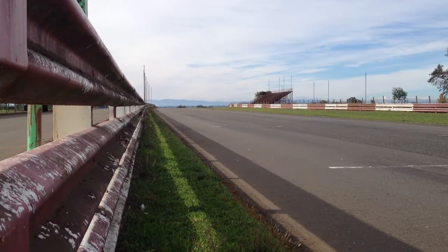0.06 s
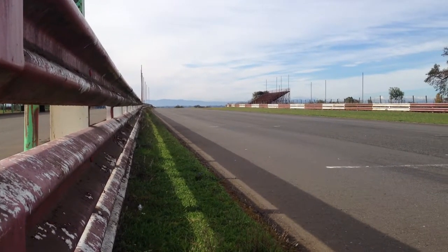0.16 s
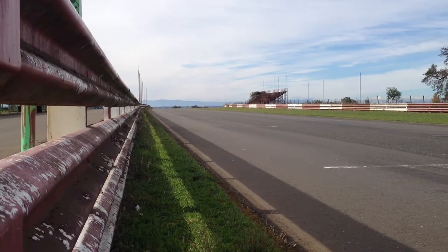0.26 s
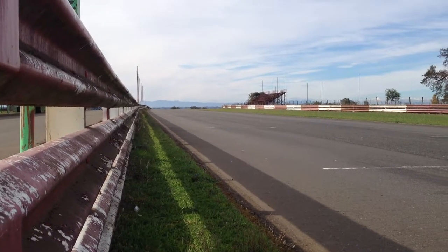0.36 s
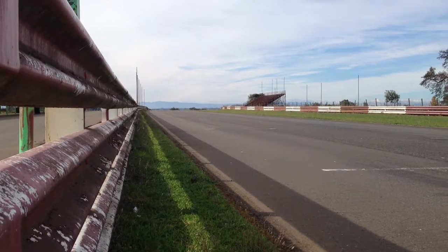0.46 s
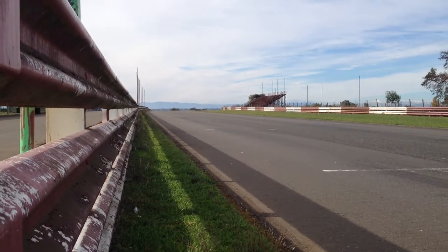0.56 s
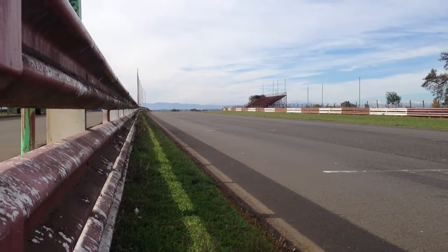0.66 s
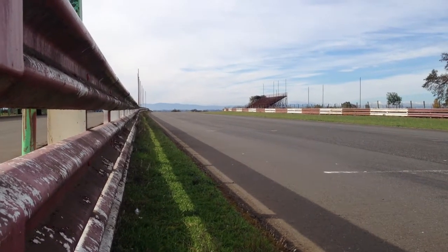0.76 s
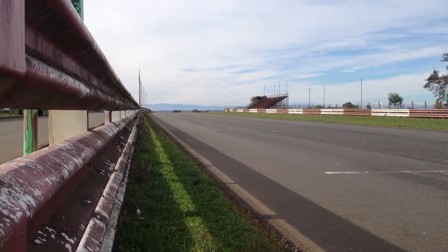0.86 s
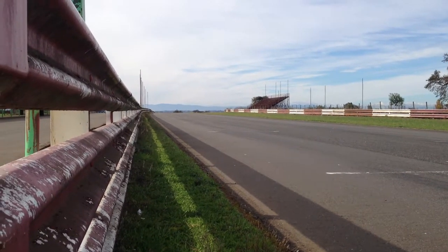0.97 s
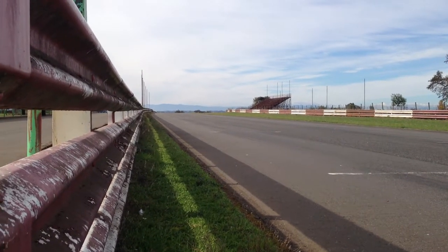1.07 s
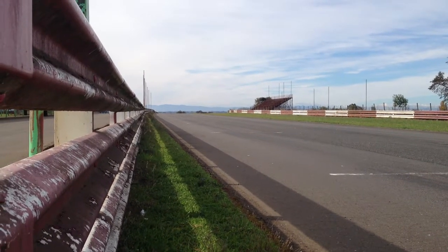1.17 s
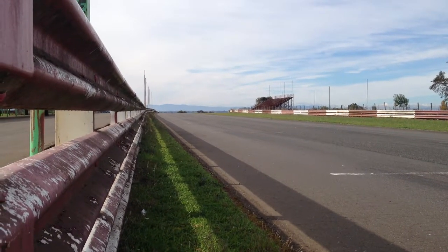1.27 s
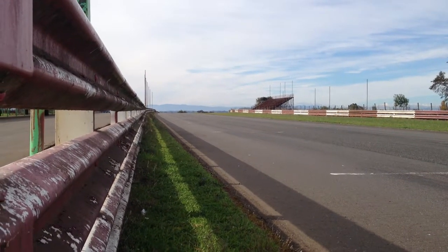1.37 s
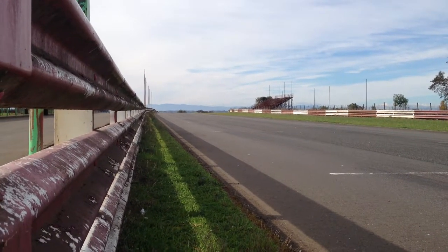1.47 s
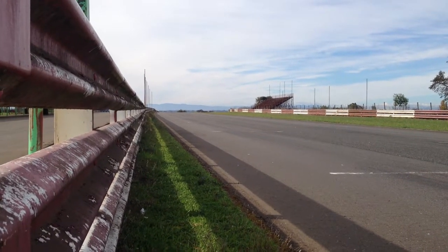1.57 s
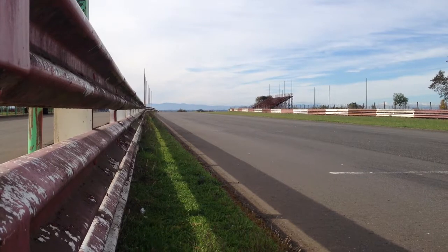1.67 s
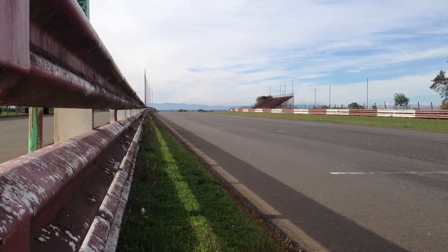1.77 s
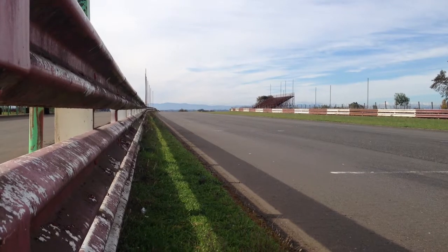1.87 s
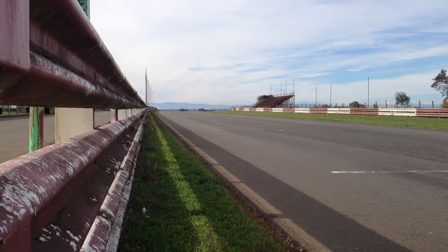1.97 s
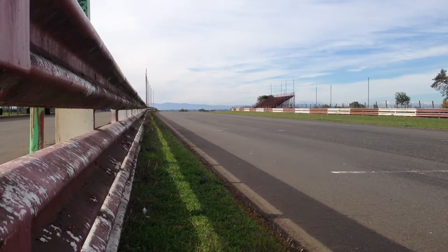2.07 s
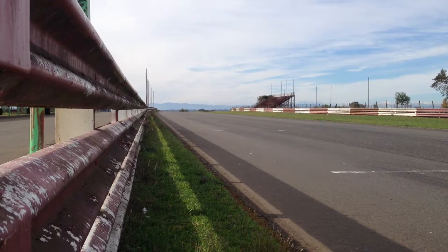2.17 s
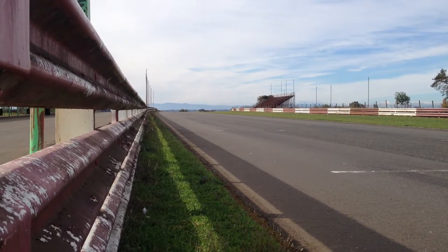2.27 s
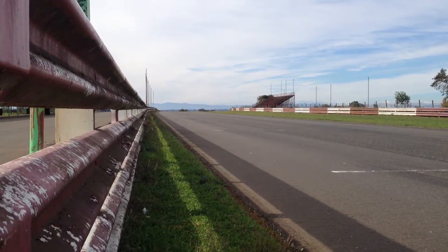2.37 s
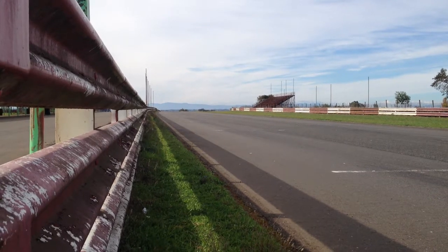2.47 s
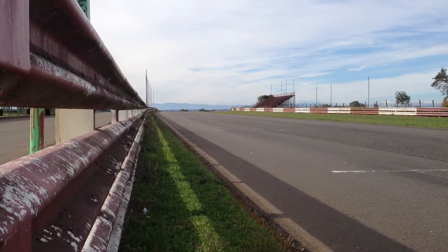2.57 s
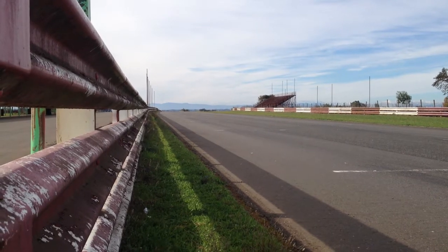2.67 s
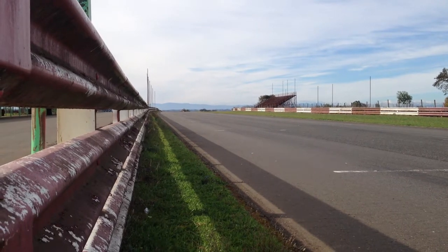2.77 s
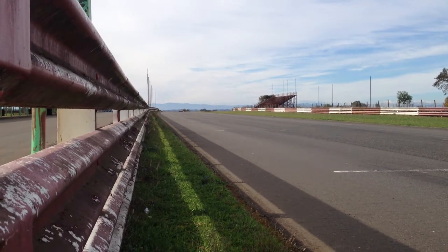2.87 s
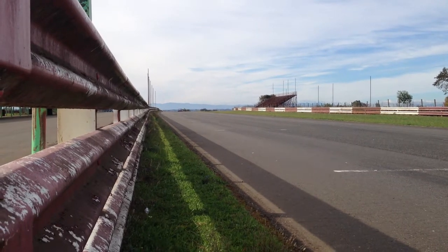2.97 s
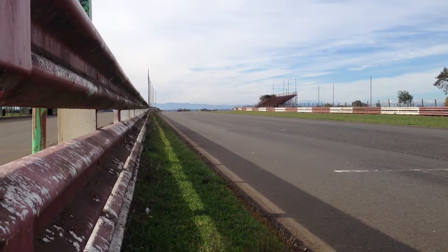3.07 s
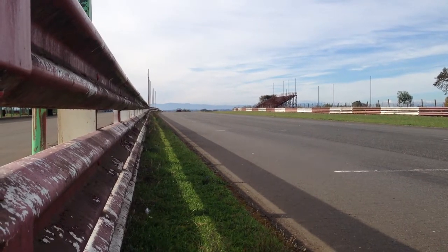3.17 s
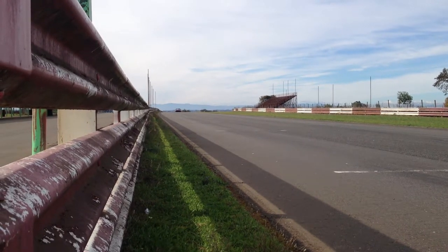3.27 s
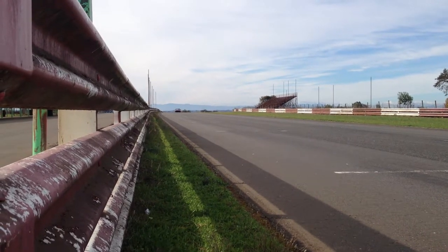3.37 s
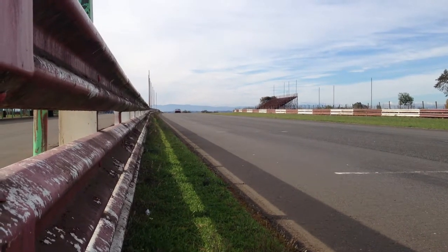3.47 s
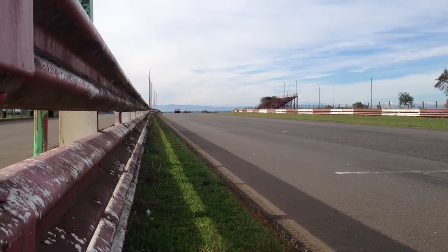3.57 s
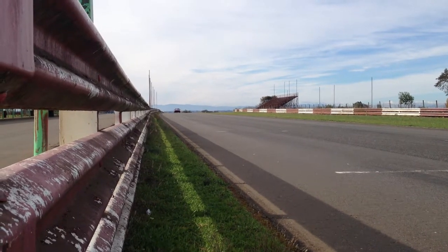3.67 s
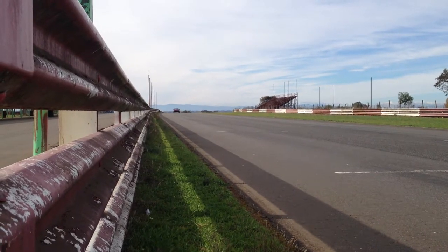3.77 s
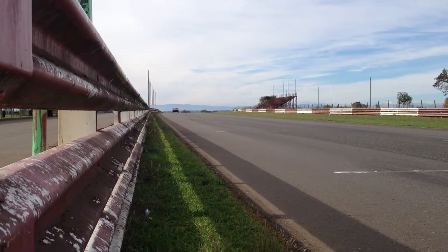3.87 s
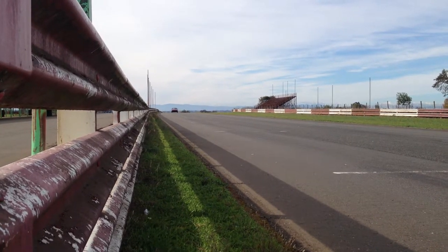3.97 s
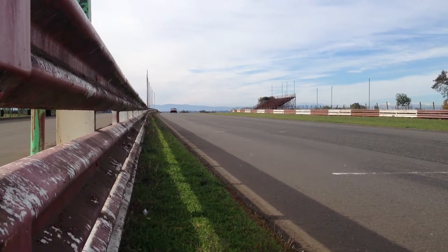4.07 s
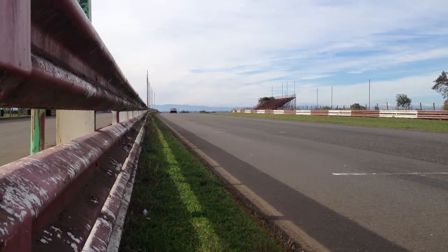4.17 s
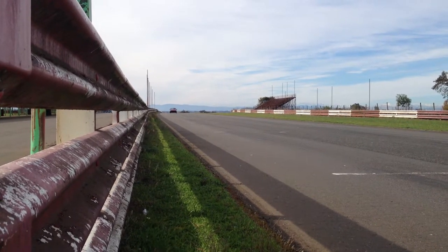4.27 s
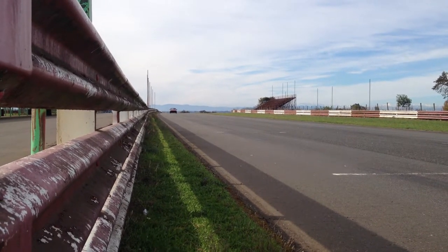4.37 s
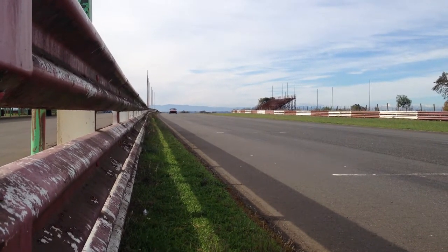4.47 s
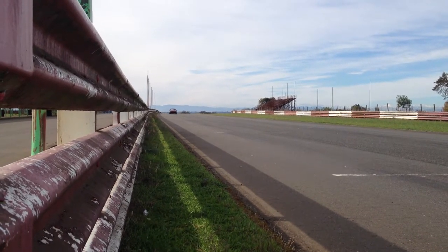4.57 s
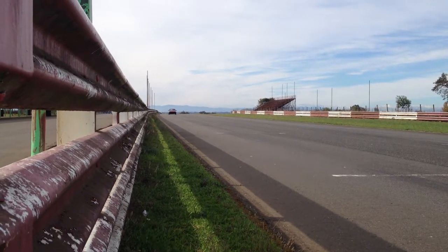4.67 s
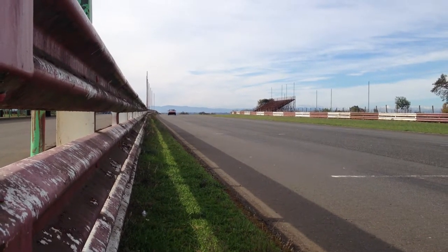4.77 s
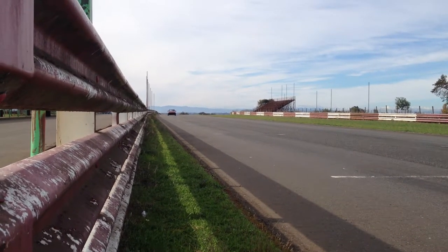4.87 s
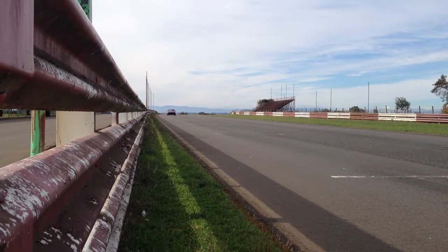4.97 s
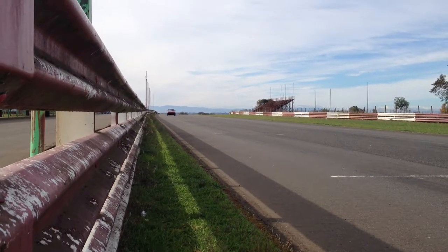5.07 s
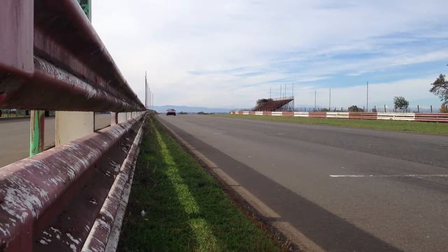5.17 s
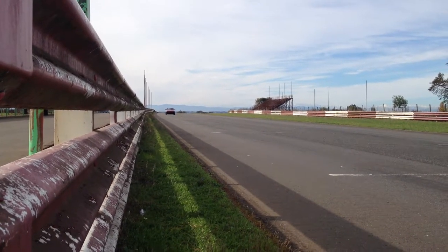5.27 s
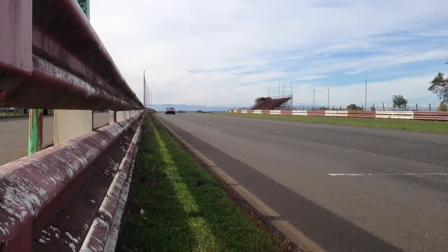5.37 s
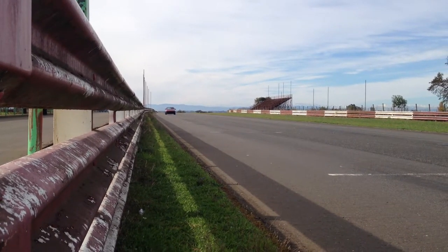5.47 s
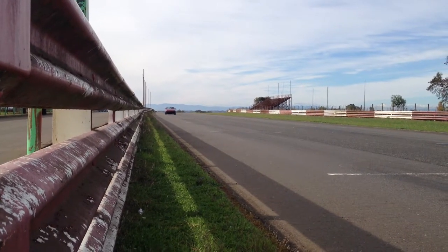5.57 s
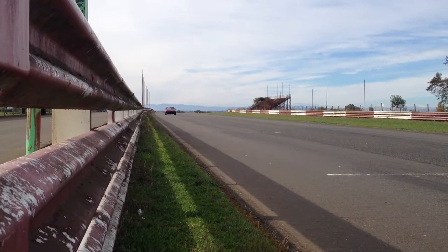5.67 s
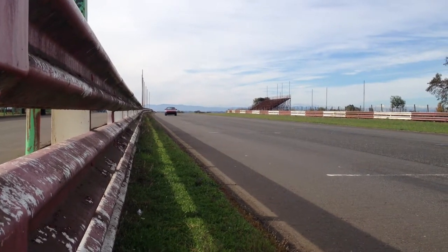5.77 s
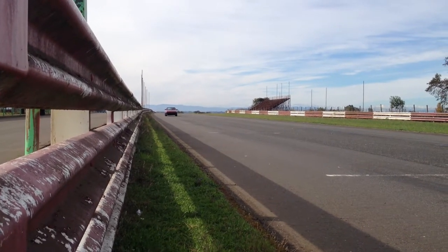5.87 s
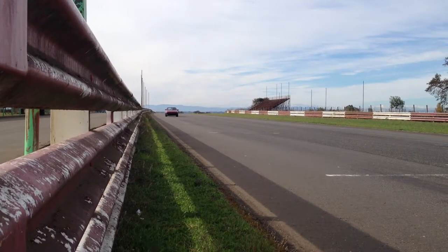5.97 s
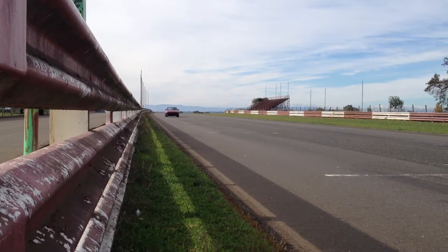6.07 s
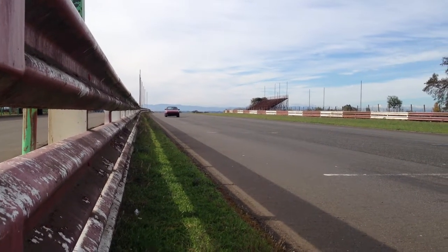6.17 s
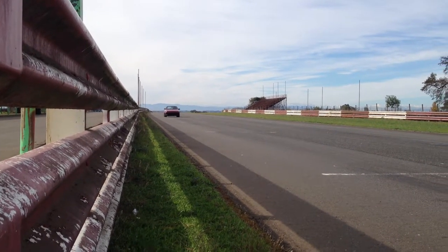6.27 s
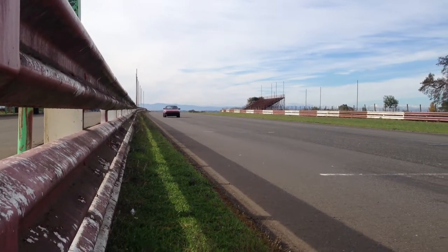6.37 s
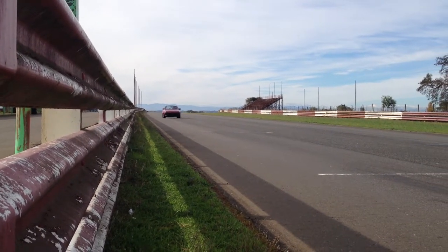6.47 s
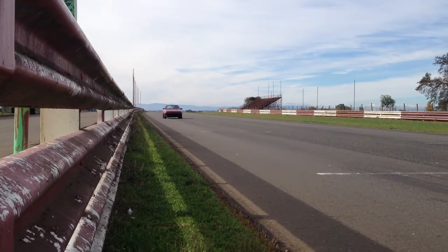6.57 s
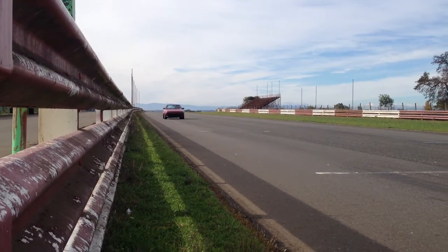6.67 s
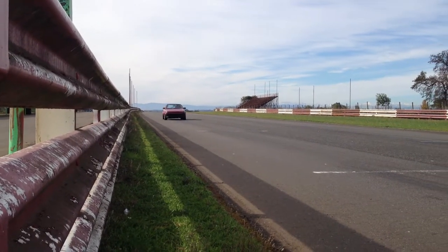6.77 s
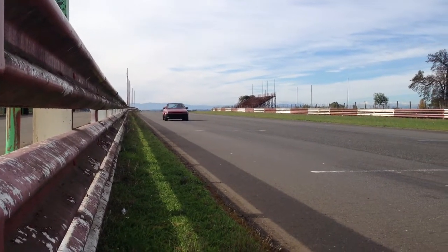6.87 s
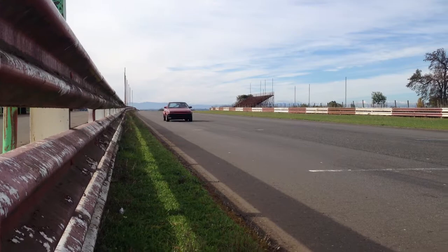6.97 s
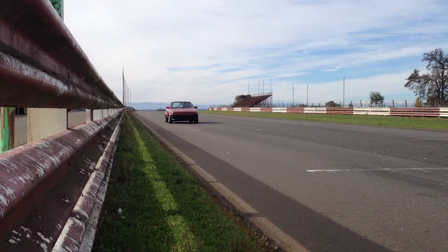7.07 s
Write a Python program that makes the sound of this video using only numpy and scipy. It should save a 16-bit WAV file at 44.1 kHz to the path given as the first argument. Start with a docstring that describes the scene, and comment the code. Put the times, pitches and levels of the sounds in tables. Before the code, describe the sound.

Far-off engine whine rises, dips sharply with a gear change around two seconds, then climbs steadily to a loud, harsh approach that never passes.

```python
"""A straight road with a steel guard rail, the microphone beside it: a small four-cylinder car nears, accelerating.
It pulls to the top of one gear, lifts for the change and climbs again, louder and brighter as it nears.
Clean tones at multiples of the firing rate make the note; filtered firing pulses and gas noise make the rasp.
An echo off the far barrier beats with the low orders; the upper orders swell and fade on their own.
Tyre rumble, hiss, exhaust pops and low thumps join in over quiet air and recorder noise."""
import sys
import numpy as np
from scipy import signal
from scipy.fft import rfft, irfft, next_fast_len
from scipy.io import wavfile
from scipy.ndimage import uniform_filter1d, map_coordinates

SR = 44100
rng = np.random.default_rng(int(sys.argv[2]) if len(sys.argv) > 2 else 0)


def store_pcm(level_fs):
    """Save levels as 16-bit WAV."""
    pcm = np.round(np.clip(level_fs, -1, 1) * 32767).astype(np.int16)
    wavfile.write(sys.argv[1], SR, np.atleast_2d(pcm).T)


N = 314433

# the car's approach, before trims and fades: (time [s], firing rate [Hz], firing note [dB],
# other orders over the note [dB], roar [dB], treble over the roar [dB])
CAR = [(0, 251, -40, -1.5, -65.5, -7), (.3, 259.9, -39.5, -2, -63.5, -3.5), (.9, 268.3, -39, 1, -61.5, -4),
       (1.3, 275, -39, 3.5, -61, -6.5), (1.83, 284, -38.5, 4, -57, -2.5), (1.92, 268, -40.5, 3, -60, -6.5),
       (2.12, 249, -42, -1.5, -58.5, -6), (2.28, 234.3, -38, 0.5, -54, -9.5),
       (2.35, 215.4, -38, -3.5, -52.5, -11), (2.45, 194.5, -35, -4.5, -51, -11.5),
       (2.67, 197.9, -35, -3.5, -53, -1), (3.1, 203, -32, -3.5, -49.5, -1),
       (3.55, 207.5, -31, -1, -46.5, -2.5), (4.1, 215.5, -27, -1.5, -43.5, -5),
       (4.55, 221.6, -24.5, -2.5, -43, -3), (4.95, 227.3, -26, 1, -40.5, -6.5),
       (5.4, 233.9, -23.5, 3.5, -37.5, -9), (5.8, 239.4, -20, 2, -35.5, -5.5),
       (6.2, 244.8, -17.5, -1, -30.5, -6.5), (6.6, 250.4, -14, -4, -27, -6),
       (7.0, 254.5, -12.5, -5.5, -22, -7), (7.13, 257.9, -12, -4, -23, -9)]
# clean tones beside the note, by multiple of the firing rate: (level over the note and other-orders curves [dB],
# added in the first gear heard [dB], added with the foot off [dB])
ORDERS = {".75": (-15, 1, -9), "1.25": (-11, -12, -23), "1.75": (-22.5, -4, -6), "2": (-13.5, -7, -9.5),
          "2.25": (-38, -4, -8), "3": (-27.5, -7.5, -5.5), "3.5": (-32.5, -11, -8), "4": (-28.5, -6, -1.9),
          "4.25": (-33, -9, 0), "5": (-33.5, -7, -8), "6": (-36, -2, -3), "7": (-35.5, -3, -2),
          "8": (-38.5, -3, 1), "9": (-40.5, 1.3, 2), "10": (-43.5, -1.5, -4), "2.75": (-32.5, -9, -9),
          "3.25": (-36.5, -9, -3), "3.75": (-35, -7, 0), "4.5": (-41, 0, -4), "4.75": (-41.5, 0, -4),
          "13": (-49.5, 0, -4), "11": (-40, -7, -4), "12": (-43.5, -5, -4)}
LIFT_S, BITE_S, LOCK_S = 1.87, 2.285, 2.48  # foot off, clutch bites, clutch locked
ARRIVE_S = 8.1  # the car would draw level then, after the end


def revs():
    """Firing rate [Hz]: the driveline winds and unwinds, so the revs rock around their climb."""
    # (middle [s], half length [s], period [s], depth [Hz], time of a crest [s])
    rocking = [(.7, .52, .26, 6.3, .615), (2.3, .17, .085, 3, 2.255), (5.8, .45, .2, 2.2, 5.7)]
    t = np.arange(N) / SR
    rate_hz = curves(CAR)[0]
    for middle, half, period, depth_hz, crest in rocking:
        rate_hz = rate_hz + bumps([(middle, half, depth_hz)]) * np.cos(2 * np.pi * (t - crest) / period)
    return rate_hz


def unsteady():
    """Unevenness of firing: more ragged through the gear change."""
    return 1.35 + 2.55 * during(LIFT_S, LOCK_S)


def note(fired):
    """The strong orders are clean tones that drift in level and phase; some beat with an echo."""
    # the firing note dips or surges briefly: (time [s], half length [s], level [dB])
    flutter = [(.6, 0.036, -2), (.89, 0.024, -4.5), (.98, .07, 2), (1.15, 0.029, -3.5), (1.87, 0.034, -8),
               (2.02, 0.018, -8), (2.07, 0.021, -7), (2.19, 0.012, -12), (2.25, .02, -3),
               (2.49, 0.0067, -8), (3.6, 0.019, -3), (4.23, 0.098, -1.5), (5.95, 0.013, -6),
               (6.06, 0.022, -2.5), (6.16, .04, 2.5), (6.26, 0.027, -1), (6.39, 0.032, -1.5),
               (6.735, 0.026, 4.5), (6.85, 0.066, -1.5), (6.945, 0.029, 2.5), (6.49, 0.039, 2),
               (6.32, 0.021, 3), (6.58, 0.015, -4), (7.03, 0.016, -7.5), (7.075, 0.025, 1),
               (4.92, 0.031, -2.5), (2.43, 0.018, -3.5)]
    # an order swells or sinks for a while, by order: (time [s], half length [s], level [dB])
    swells = {".75": [(1.78, 0.054, 1), (4.45, 0.28, 3.5)], "1.25": [(.3, 0.93, 0.5), (2.32, 0.05, 7.5),
              (4.3, 0.73, 3.5), (6.25, 0.14, 3.5)], "1.75": [(.15, .06, 9), (.4, 0.39, -8), (4.2, 1, -2.5),
              (4.9, 0.33, 7.5), (6.5, 0.61, 7)], "2": [(0.9, 0.28, 6.5), (2.34, 0.063, -10),
              (3.19, 0.11, -15), (5.3, 0.59, -3.5), (2.06, .05, 6), (2.23, .03, 6), (2.385, .02, 8),
              (6.9, .2, 5), (4.54, 0.17, -13), (1.92, .12, -7.5)], "2.25": [(5.1, .3, 8.5),
              (6.8, 0.82, 19.5)], "3": [(1.54, 0.15, 9), (2.5, .04, 14), (2.36, .035, 9), (2.48, .04, 8),
              (3.29, .3, 7.5), (4.2, .05, -6), (5.06, .02, -15), (6.95, .3, 3.5), (5.45, 1.53, 10.5),
              (4.97, 0.038, 8), (0.14, .12, 8), (.6, .04, 9), (4.32, .3, 4)], "3.5": [(3.4, 1, 7)],
              "4": [(3.22, 0.76, 12.5), (4.2, 0.4, 5), (5.4, 0.44, 5), (6.9, 0.19, 6), (1.65, .08, 2)],
              "4.25": [(6.86, 0.41, 14), (3.4, 0.41, -6.5)], "5": [(0.25, .07, 13), (0.91, 0.13, 13.5),
              (1.22, .08, 14), (2.33, .05, 10), (5.2, .1, 5), (2.983, 0.23, 15), (4.425, 0.6, 13),
              (7, 0.2, 18), (2.65, .1, 9), (3.5, 0.077, 7)], "6": [(1.217, 0.054, 12), (3.92, 0.083, 9.5),
              (1.72, 0.13, 7), (4.927, 0.52, 11.5), (6.93, 0.72, 20), (.5, .15, 4), (3.1, 0.09, 8),
              (3.45, .15, 8), (9.3, .15, 4.5)], "7": [(3.08, 0.42, 22.5), (3.87, 0.43, 13),
              (6.15, 0.31, 13), (6.58, 0.21, 18), (7, .2, 17.5), (2.6, 0.12, 10.5)],
              "8": [(3.06, 0.55, 22.5), (1.83, 0.081, 13), (4.8, .25, 6)], "9": [(.3, 0.25, 7),
              (.95, 0.12, 11), (1.45, .15, 4), (6.85, 0.18, -1), (3.05, 0.43, 21), (3.9, 0.21, 13.5),
              (6.1, .3, 0)], "10": [(3.05, 0.32, 11), (3.7, .3, 16.5), (6.05, 0.087, 8), (7, .15, 6)],
              "2.75": [(5.95, 0.82, 8.5)], "3.25": [(4.1, 0.91, 17)], "3.75": [(3.4, 1.5, 9.5)],
              "4.5": [(6.3, 0.67, 17)], "4.75": [(5.25, 0.62, 15.5), (6, .3, 5), (7, .15, 12)],
              "13": [(3.4, 0.29, 20)], "11": [(3.4, .15, 14), (2.63, 0.15, 17), (2.86, 0.2, 17),
              (3.3, .15, 9)], "12": [(2, .06, 14), (2.9, .3, 16), (2.9, .15, 16.5)]}
    # echo off the far barrier, by order; a negative share is inverted: (lag part growing as the car nears,
    # at one second away [ms], constant lag part [ms], share far away, share at one second away)
    echoes = {".75": (33.5, -16.5, -0.3, 1.27), "1": (28.5, -1.5, 0.13, 0.13),
              "1.25": (37, -13.5, -0.25, 1.38), "1.75": (22, 40.3, 0.36, 0.8), "2": (31.5, -7.5, 0.5, 1.3),
              "3": (37, -17.5, 0.3, 0.7)}
    # how far the note's neighbours turn from bending its pitch to pulsing its level: (time [s], turn [radians])
    throb = [(0, 1.8), (1.8, 1.8), (2.5, .3), (3.4, .7), (4.1, 1.3), (4.6, .5), (7.13, .7)]
    barrier_s = 2.9  # the car comes alongside the barrier
    blur_db = -6  # orders above the third sink this far while the foot is off
    roughness = .1  # the upper orders grow rougher as the car nears [radians per order, at one second away]

    rate_hz, note_db, other_db = curves(CAR)[:3]
    lifted, first, ragged = during(LIFT_S, BITE_S), during(-1, LIFT_S), unsteady()
    changing = during(LIFT_S, LOCK_S)
    levels = {}
    for name, (db, first_db, lift_db) in ORDERS.items():
        gear_db = first_db * first + lift_db * lifted
        blurred_db = blur_db * (float(name) > 3) * lifted
        levels[name] = note_db + other_db + db + gear_db + bumps(swells[name]) + blurred_db
    levels[".5"] = levels[".75"] - 21 + 20 * np.log2(rate_hz / 240)  # crank-rate order fades fast as revs fall
    levels["1"] = note_db + bumps(flutter)

    # the neighbours .75 and 1.25 keep a phase relation to the note
    shake, beside = wobble(12), rng.uniform(0, 2 * np.pi) + wobble(1.214)
    opposite = np.pi + curves(throb)[0] - beside + 0.33 * wobble(3.3)
    locked = {.75: beside, 1: 0, 1.25: opposite, 2: 0}
    tones = np.zeros(N)
    for name, db in levels.items():
        k = float(name)
        wander = locked.get(k, rng.uniform(0, 2 * np.pi) + 1.67 * wobble(1.195))
        raggedness = 0.1 * k * ragged * (shake if k < 1.5 else wobble(9))
        turn = 2 * np.pi * k * fired + raggedness + wander
        turn += roughness * k * (k > 2) / away() * wobble(45)

        near_ms, constant_ms, far, near = echoes.get(name, (0, 0, 0, 0))
        share = far + (near - far) / away()
        echo = share * during(barrier_s, ARRIVE_S) * amp(3 * wobble(6))
        lag_s = (constant_ms + near_ms / away()) / 1000
        scatter = .2 * k * wobble(7)  # gaps and posts make the echo path uneven
        echoed = echo * np.cos(turn - 2 * np.pi * k * rate_hz * lag_s + scatter)
        tone = (np.cos(turn) + echoed) / np.sqrt(1 + echo ** 2)

        fade_db = (.7 + 2.5 * (k > 1.5) * changing) * min(k - .4, 1.6) * wobble(14)
        # orders without an echo fade further on their own
        fade_db = fade_db + (2.2 + 1.5 * first * (k > 2)) * (name not in echoes) * wobble(8)
        tones += np.sqrt(2) * amp(db + fade_db) * tone
    return tones


def weak_orders(fired, fade_db, fade_rate):
    """Unequal cylinders sound every quarter of the firing rate; echoes fade each such line on its own."""
    # (frequency [Hz], level relative to the other weak lines [dB])
    between = [(290, -16.5), (400, -7), (750, 2), (900, -9.5), (1100, -4), (1260, -7.5), (1450, -3),
               (1700, -3.5), (1950, -11.5), (2250, -6), (2600, -7.5), (3000, -16)]
    rate_hz, roar_db = curves(CAR)[0], curves(CAR)[3]
    f, db = np.transpose(between)
    strong = [float(name) for name in ORDERS]
    lines = np.zeros(N)
    for k in np.arange(6, 52) / 4:
        if k not in strong:
            level_db = np.interp(np.log(k * rate_hz), np.log(f), db) + fade_db * wobble(fade_rate)
            turn = 2 * np.pi * k * fired + 0.18 * k * wobble(8) + rng.uniform(0, 2 * np.pi)
            lines += amp(level_db) * np.sin(turn)
    blur_db = 2.2 * during(LIFT_S, LOCK_S)  # uneven firing blurs them in the gear change
    return amp(roar_db - 12.5 - blur_db) * lines


def blows(fired, jitter, scatter_db):
    """One pulse a firing; the cylinders differ in strength and timing, and chance [firing gaps, dB] adds to it."""
    # (relative blow strength, lateness [firing gaps])
    cylinders = [(0.5, 0), (0.78, 0.017), (0.88, 0.012), (0.68, -0.007)]
    count = np.arange(1, int(fired[-1]))
    strength, late = np.transpose(cylinders)[:, count % 4]
    chance = rng.standard_normal((len(count), 2))
    at = np.interp(count + late + jitter * chance[:, 0], fired, np.arange(N - 0.))
    size = strength * amp(scatter_db * chance[:, 1])
    # each pulse is shared between the two samples around its moment
    whole = at.astype(int)
    early = np.bincount(whole, size * (1 - at + whole), N + 1)
    later = np.bincount(whole + 1, size * (at - whole), N + 1)
    return unit(early + later)[:N]


def rasp(fired):
    """Pulses and gas noise, puffed once a firing, ring in pipe and bodywork."""
    # colours of the four bands: (frequency [Hz], relative density [dB per Hz])
    roar_colour = [(200, -44), (340, 1.5), (700, -1.5), (1080, -4), (1250, -11), (1430, -3), (1750, -1),
                   (1950, -10), (2400, -26)]
    ring_colour = [(1700, -38), (2050, -5), (2200, 4), (2320, 2), (2450, 5), (2600, 1.5), (2730, -6.5),
                   (3100, -53.5)]
    rattle_colour = [(2500, -27), (2850, -11), (3250, -9), (3600, -12.5), (3900, -27)]
    clatter_colour = [(3400, -11.5), (3750, -2.5), (4050, -6), (4350, -10.5), (4650, -1.5), (4950, -16.5),
                      (5600, -39.5)]
    # the pipe and panels ring up or sink for a while:
    # (time [s], half length [s], ring [dB], rattle [dB], clatter [dB])
    buzzes = [(0.216, 0.15, 2, -2, -6), (.6, 0.065, -5, -3, -3), (.94, 0.15, 7.5, 0, -1),
              (1.435, 0.16, 3.5, 5, -1), (1.815, 0.056, -2, -1, -1), (2.05, 0.12, 5, 3.5, -0.5),
              (2.403, 0.16, 7.5, 12, 5), (2.702, 0.12, 0.5, -3, -4), (3.205, 0.44, 8.5, 3.5, -1.5),
              (6.052, 0.036, 2.5, 2, -0.5), (6.4, 0.45, -3, -2.5, 1), (5.298, 0.18, -4.5, -0.5, 0),
              (3.44, 0.07, 0.5, 3, 4.5), (3.65, 0.1, 4, -1, -4), (3.966, 0.082, 0.5, 0, -1),
              (4.21, 0.13, 0.5, 5.5, 2), (4.496, 0.14, -0.5, -2, -2), (5.736, 0.14, -3, 5, 0.5),
              (6.898, 0.24, 3, 2.5, 2)]
    own_waver_db = 1  # ring, rattle and clatter each waver in level on their own

    roar_db, treble_db = curves(CAR)[3:]
    s, half, *lifts = np.transpose(buzzes)
    ring_db, rattle_db, clatter_db = (roar_db + treble_db + bumps(zip(s, half, db)) for db in lifts)
    pulses = patchy(blows(fired, jitter=.007, scatter_db=1.2), depth_db=3.5, bins=1, frames=36)
    puff = 1 + .5 * np.cos(2 * np.pi * fired) + 0.043 * np.cos(np.pi / 2 * fired)
    noise = patchy(unit(puff * rng.standard_normal(N)), depth_db=2.8, bins=3, frames=14)

    def gas(share):
        """Pulses with this share of their power given to noise."""
        return np.sqrt(1 - share) * unit(pulses) + np.sqrt(share) * noise

    roar = amp(roar_db - 5.5) * coloured(gas(.9), roar_colour)
    ring = amp(ring_db - 2) * coloured(gas(.3), ring_colour)
    rattle = amp(rattle_db - 5.5) * coloured(gas(.4), rattle_colour)
    clatter = amp(clatter_db - 3.5) * coloured(gas(.7), clatter_colour)
    return roar + sum(amp(own_waver_db * wobble(13)) * band for band in (ring, rattle, clatter))


def flares(fired):
    """Narrow resonances flare up: each is a fuzzy tone around a fixed pitch, puffed once a firing."""
    # (time [s], half length [s], pitch [Hz], level before puff and fuzz [dB])
    resonances = [(.08, 0.11, 2420, -66), (.24, .08, 2440, -71.5), (0.452, .06, 2470, -64),
                  (.47, .05, 4550, -74), (.68, .07, 4700, -78), (.93, 0.14, 2380, -67),
                  (1.028, .05, 2350, -61), (.94, .05, 4560, -72), (1.218, .05, 4540, -66),
                  (1.23, .06, 2160, -67), (1.39, 0.09, 2440, -58), (1.522, 0.098, 4470, -70),
                  (1.59, 0.041, 2460, -57), (1.809, 0.081, 3340, -62), (1.81, 0.054, 2180, -59),
                  (1.8, .05, 2450, -61), (1.8, .06, 4570, -72)]
    t = np.arange(N) / SR
    puff = 1 + 0.47 * np.cos(2 * np.pi * fired) + 0.35 * np.cos(np.pi / 2 * fired)
    fuzz, drift = wobble(44.64), wobble(30)
    tones = np.zeros(N)
    for s, half, hz, db in resonances:
        tones += amp(db) * bumps([(s, half, 1)]) * np.cos(2 * np.pi * hz * t + 1.3 * drift)
    return puff * amp(2.4 * fuzz) * tones


def pops():
    """Unburnt fuel goes off in the pipe during the gear change: short dull puffs of noise."""
    # (time [s], level at the peak [dB])
    puffs = [(1.87, -47), (2.205, -44), (2.25, -52)]
    shape = bumps([(s, 0.015, amp(db)) for s, db in puffs])
    return shape * coloured(rng.standard_normal(N), [(75, -30), (140, 7), (240, 6), (400, -10), (900, -30)])


def thumps():
    """Soft one-sided pushes on the loudest surges, heard below the engine note."""
    # (time [s], half length [s], peak level [dB])
    pushes = [(6.737, .007, -44), (6.925, 0.0062, -49), (6.955, .006, -46), (7.078, .008, -38)]
    return bumps([(s, half, amp(db)) for s, half, db in pushes])


def road(fired):
    """Tyre rumble and the hiss of gas and air; the air swallows the top until the car is near."""
    # colours of the three noises: (frequency [Hz], relative density [dB per Hz])
    rumble_colour = [(25, -27.5), (70, -18), (120, -5), (200, 16), (280, 7), (380, -11.5), (600, -24)]
    hiss_colour = [(4200, -17), (5200, 0), (6300, 0), (8500, -8), (10000, -20), (12000, -29.5)]
    top_colour = [(7500, -18.5), (9000, 3), (10500, 1), (12500, -2.5), (15300, -9)]
    # the hiss swells for a while: (time [s], half length [s], level [dB])
    surges = [(3.7, 0.71, 1.5), (5.9, .3, 2), (6.15, 0.1, 2), (7.03, 0.052, 1.5)]
    rumble_near_db, rumble_fall_db = -26.5, 37  # at one second away; fall for ten times the distance
    top_near_db, air_db_per_s = -47.5, 19.5  # at one second away, before surges; loss for each further second

    roar_db, treble_db = curves(CAR)[3:]
    puff = 1 + 0.17 * np.cos(2 * np.pi * fired)
    rumble_db = rumble_near_db - rumble_fall_db * np.log10(away())
    rumble = amp(rumble_db) * coloured(rng.standard_normal(N), rumble_colour)
    hiss_db = roar_db + 0.23 * treble_db - 16 + bumps(surges)
    gas = patchy(puff * rng.standard_normal(N), depth_db=1.5, bins=14, frames=12)
    hiss = amp(hiss_db) * coloured(gas, hiss_colour)
    top_db = top_near_db - air_db_per_s * (away() - 1) + bumps(surges)
    top = amp(top_db) * coloured(puff * rng.standard_normal(N), top_colour)
    return rumble + hiss + top


def background():
    """Steady air and recorder noise."""
    # (frequency [Hz], relative density [dB per Hz])
    quiet = [(20, -18), (60, -8), (120, 14), (500, 7.5), (3000, 0.5), (8000, -16), (11000, -16),
             (13000, -8.5), (15300, -13.5)]
    return amp(-64.5) * coloured(rng.standard_normal(N), quiet)


def amp(db):
    """Decibels to gain."""
    return 10 ** (np.asarray(db) / 20)


def unit(x):
    """x at rms 1."""
    return x / np.sqrt(np.mean(x ** 2) + 1e-20)


def curves(rows):
    """One value per sample for each column after the time."""
    s, *cols = np.transpose(rows)
    return [np.interp(np.arange(N) / SR, s, c) for c in cols]


def bumps(rows):
    """Sum of bell-shaped (time [s], half length [s], height) rises."""
    t = np.arange(N) / SR
    return sum((height * np.exp(-((t - s) / half) ** 2) for s, half, height in rows), np.zeros(N))


def during(start, end):
    """1 between two moments [s], 0 outside, with short ramps."""
    return np.interp(np.arange(N) / SR, [start - .03, start + .03, end - .03, end + .03], [0, 1, 1, 0])


def away():
    """Distance of the car, as seconds until it would draw level."""
    return ARRIVE_S - np.arange(N) / SR


def wobble(rate):
    """A smooth random curve, rate knots a second."""
    coarse = np.arange(0, N + 64, 64)
    knots = rng.standard_normal(int(N * rate / SR) + 4)
    return np.interp(np.arange(N), coarse, map_coordinates(knots, [coarse * rate / SR]))


def coloured(x, points):
    """x through a causal (minimum-phase) filter with the (Hz, dB) points, -80 dB outside them; rms 1."""
    m = next_fast_len(N + 8192)
    f, db = np.transpose(points)
    gain_db = np.interp(np.log(np.fft.rfftfreq(m, 1 / SR) + 1), np.log(f), db, left=-80, right=-80)
    # folding the cepstrum makes the filter causal
    cep = irfft(np.log(amp(gain_db)), m)
    cep[1:m // 2] *= 2
    cep[m // 2 + 1:] = 0
    return unit(irfft(rfft(x, m) * np.exp(rfft(cep)), m)[:N])


def patchy(x, depth_db, bins, frames):
    """Patches of the spectrum rise and fall at random."""
    z = signal.stft(x, nperseg=512)[2]
    field = rng.standard_normal(z.shape)
    for _ in range(2):
        field = uniform_filter1d(uniform_filter1d(field, bins, 0), frames, 1)
    return signal.istft(z * amp(depth_db * unit(field)), nperseg=512)[1][:N]


def scene():
    """The car over a quiet background."""
    fired = np.cumsum(revs()) / SR  # firings so far
    waver = amp(1.2 * wobble(18))  # the level of rasp and flares wavers at random as a whole
    car = note(fired) + weak_orders(fired, fade_db=4.5, fade_rate=6)
    car += waver * (rasp(fired) + flares(fired))
    car += pops() + thumps() + road(fired)
    return (car + background())[None]


def record(dry):
    """The microphone bends the wave a little, thins the lowest bass and passes nothing above its band."""
    top_hz, bass_hz = 15350, 8
    bent = dry + 0.016 * dry ** 2
    m = next_fast_len(N + 8192)
    hz = np.fft.rfftfreq(m, 1 / SR)
    response = (hz < top_hz) * hz / (hz + bass_hz)
    return irfft(rfft(bent, m) * response, m)[:, :N]


dry = scene()
out = record(dry)
store_pcm(out)
```